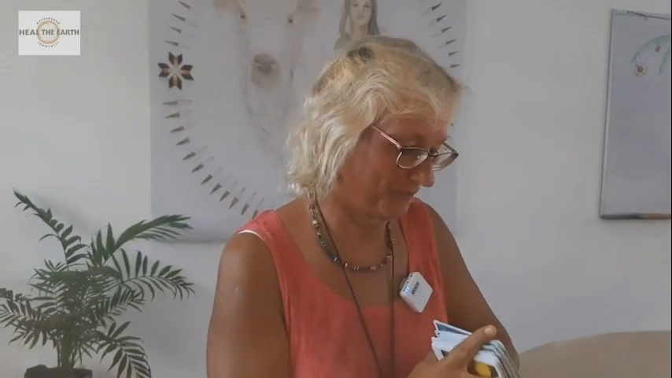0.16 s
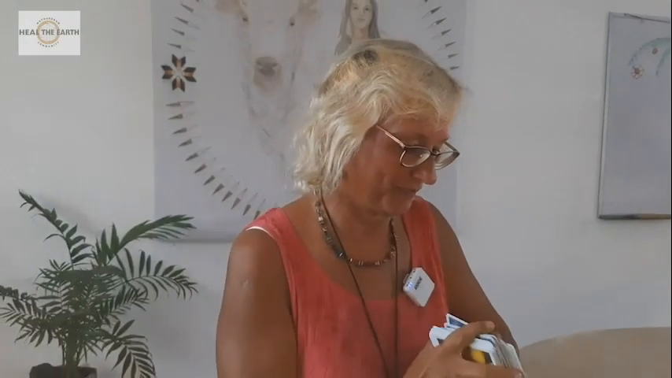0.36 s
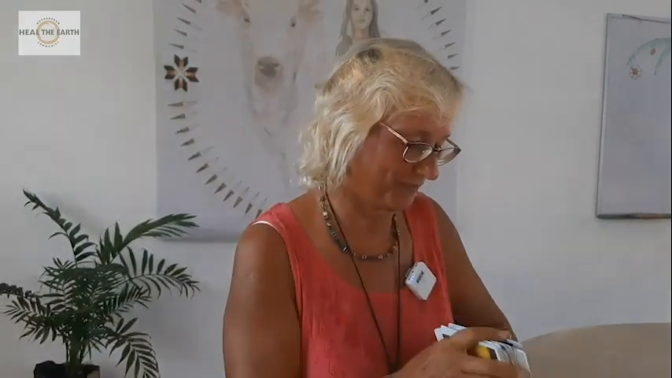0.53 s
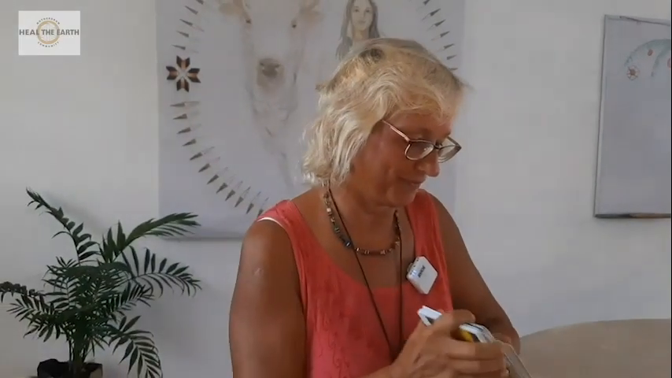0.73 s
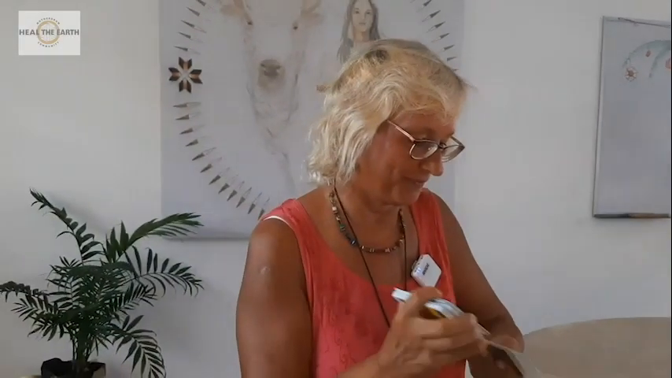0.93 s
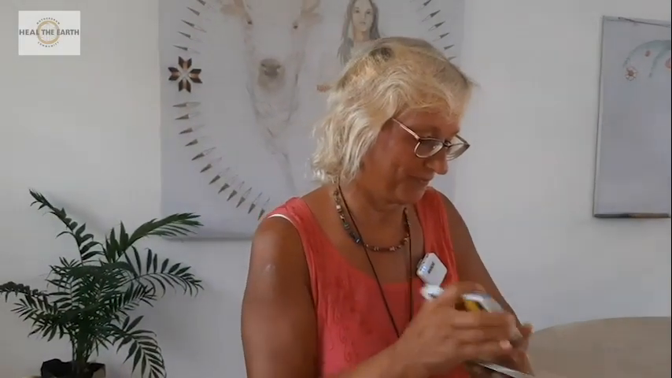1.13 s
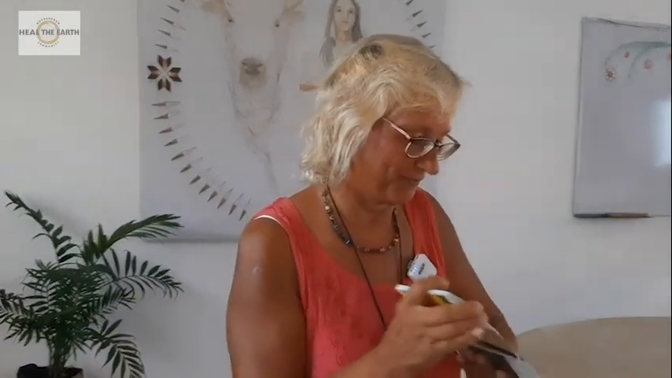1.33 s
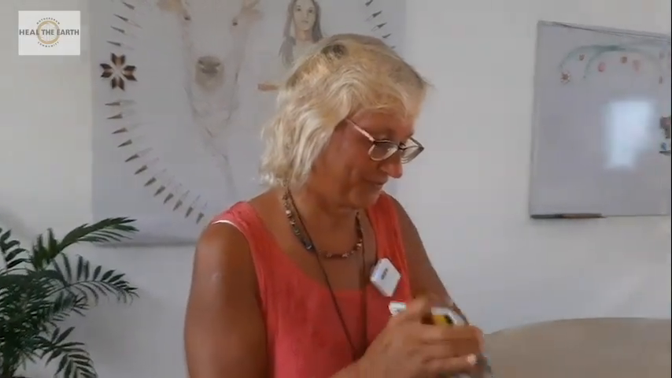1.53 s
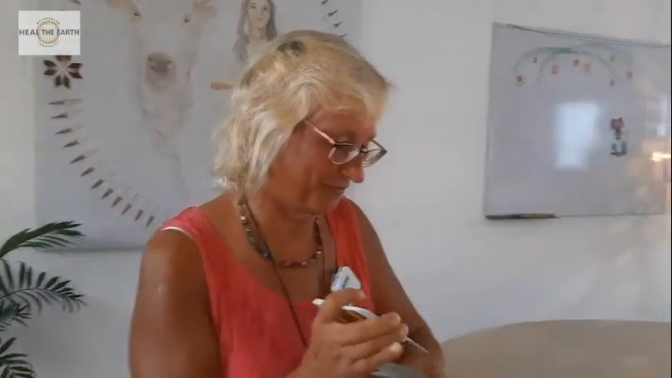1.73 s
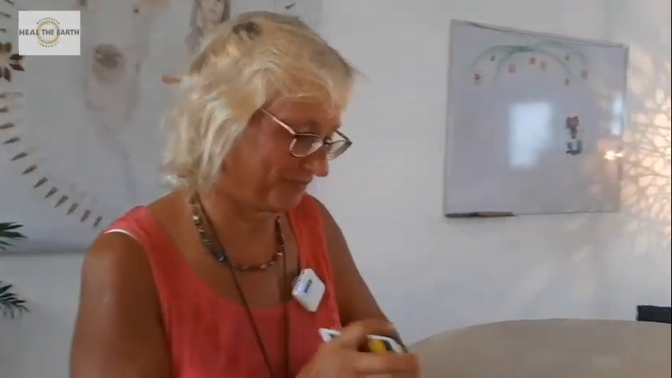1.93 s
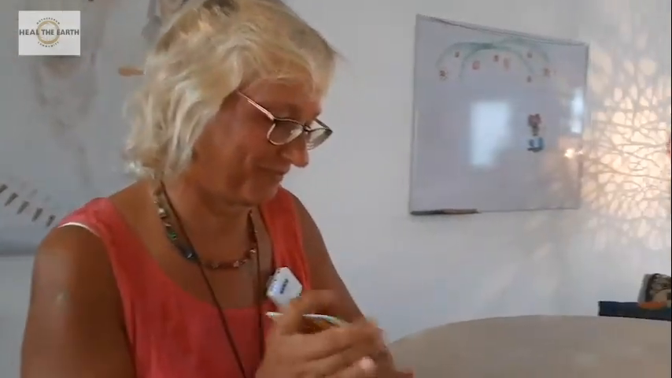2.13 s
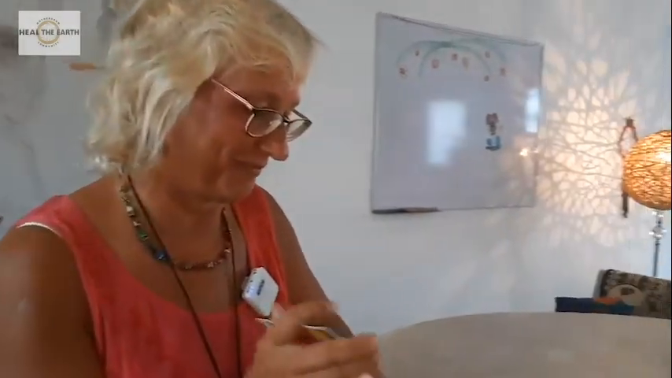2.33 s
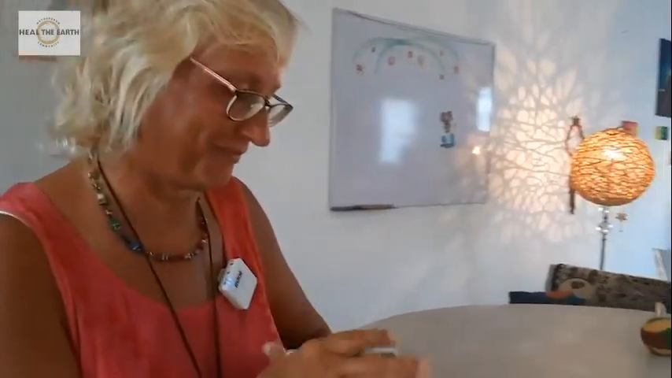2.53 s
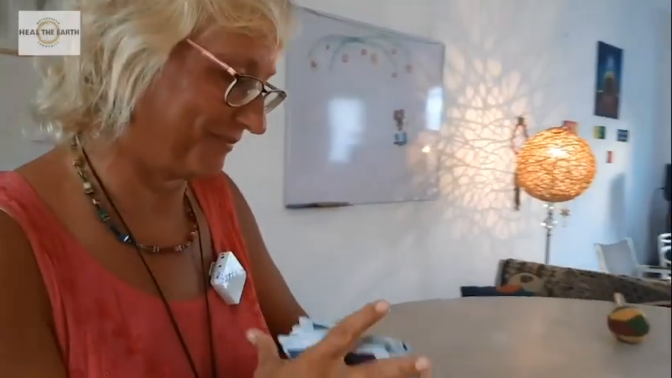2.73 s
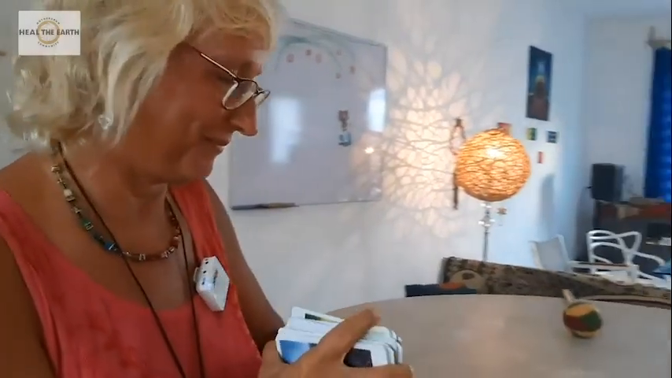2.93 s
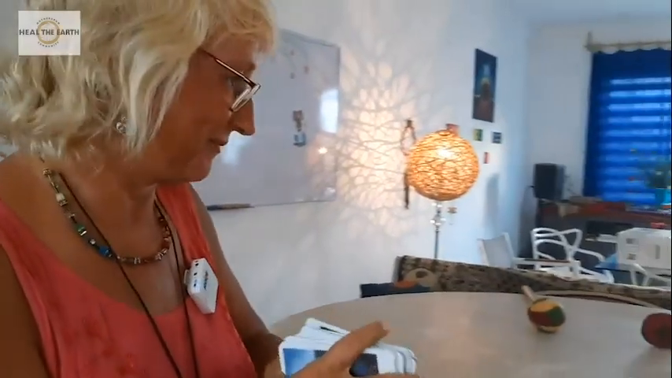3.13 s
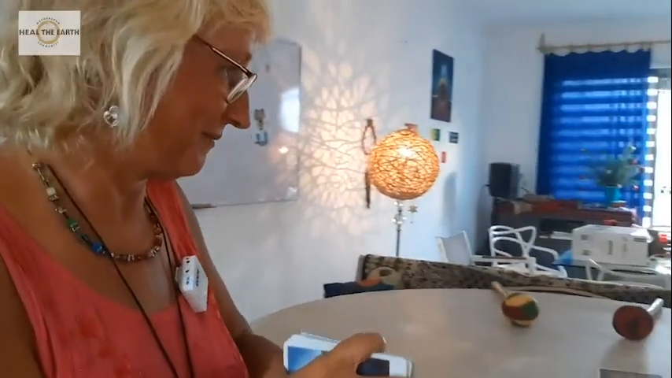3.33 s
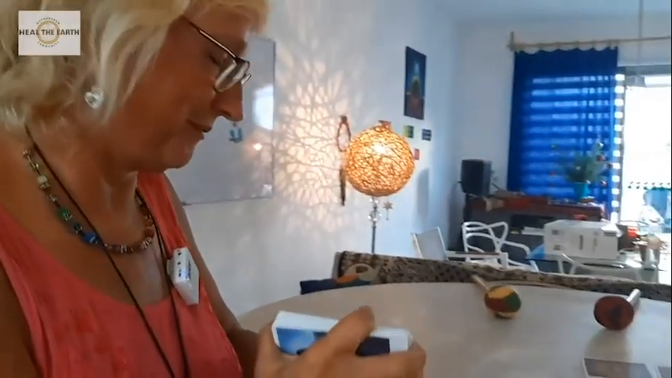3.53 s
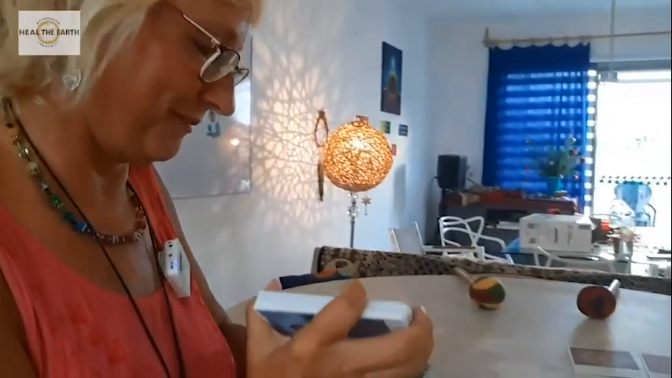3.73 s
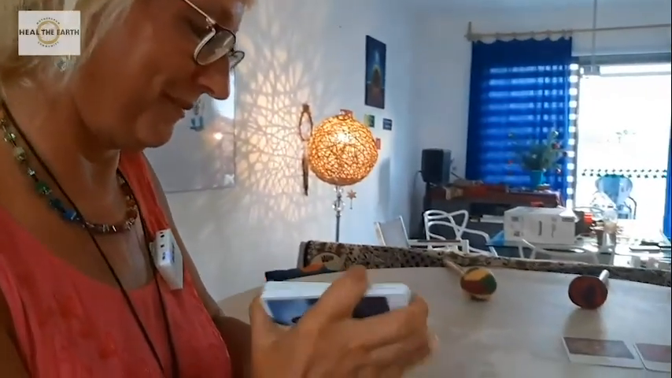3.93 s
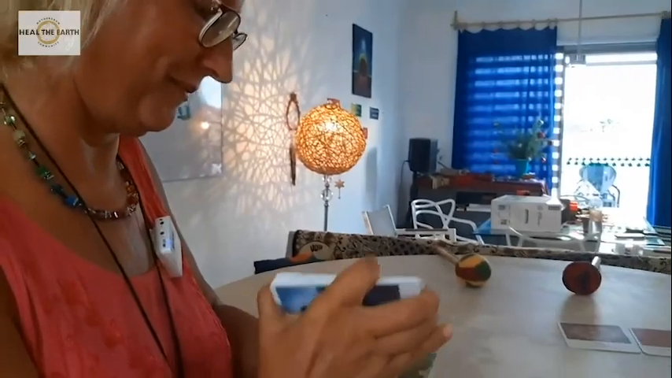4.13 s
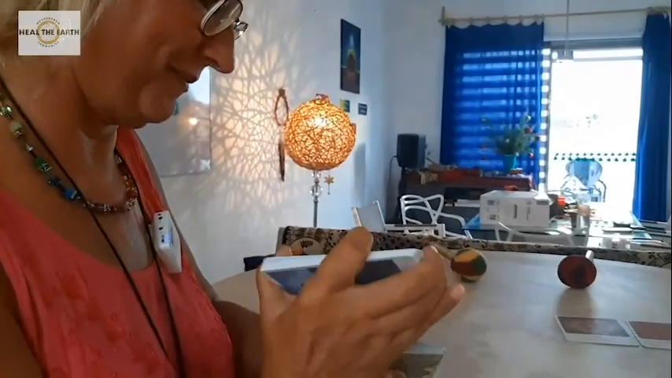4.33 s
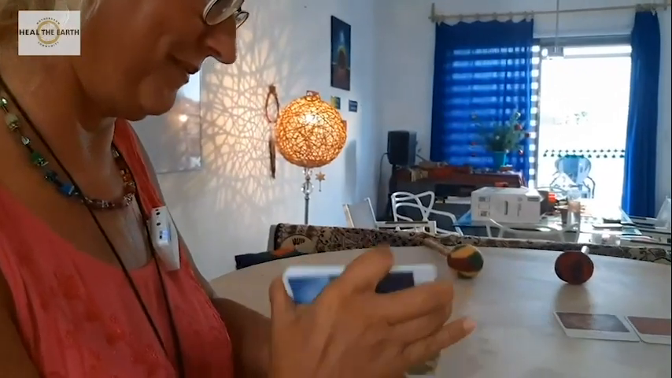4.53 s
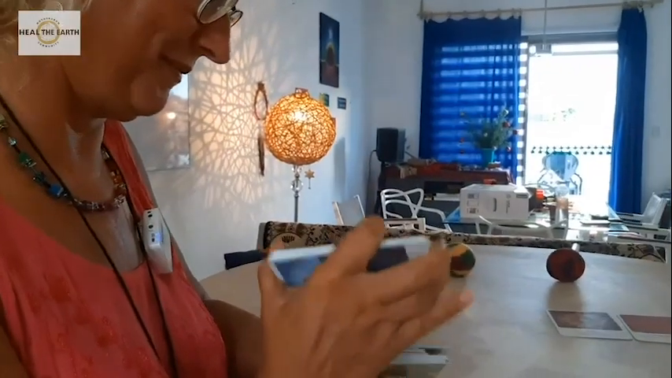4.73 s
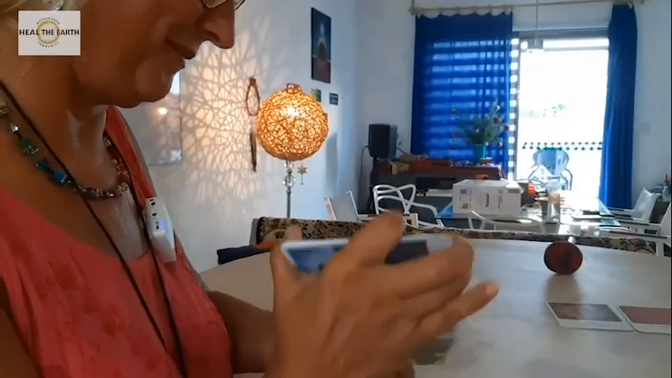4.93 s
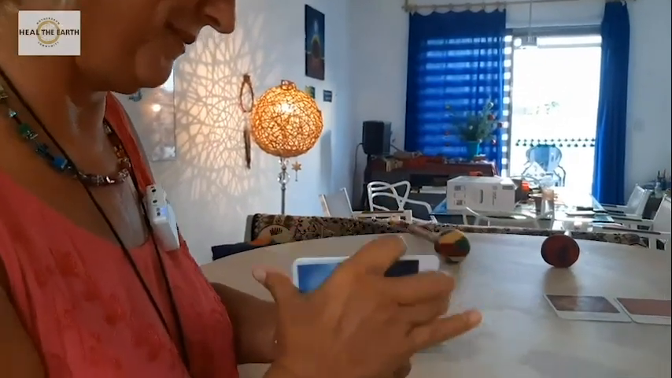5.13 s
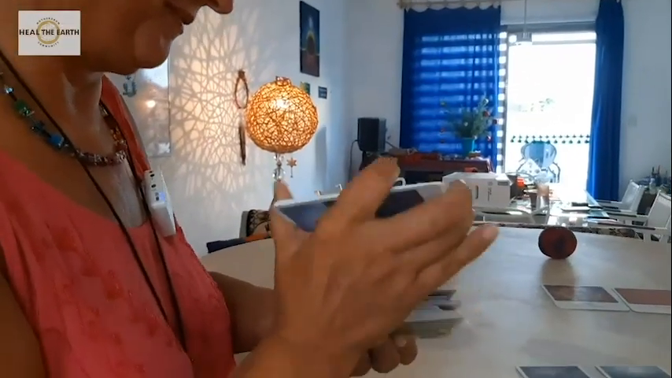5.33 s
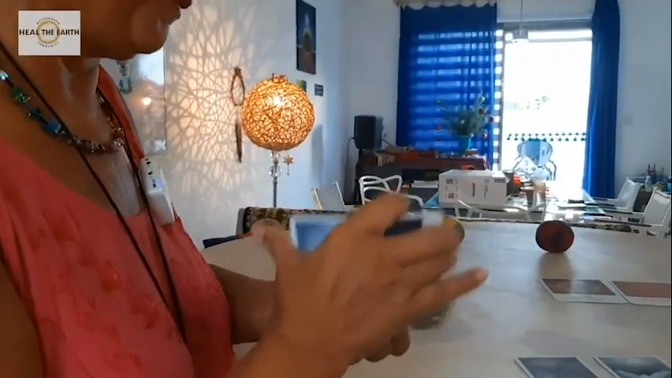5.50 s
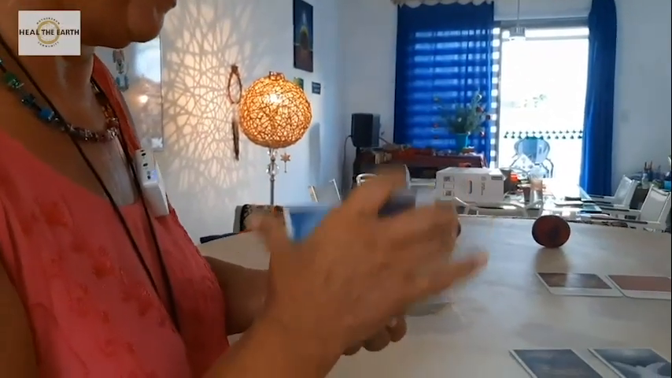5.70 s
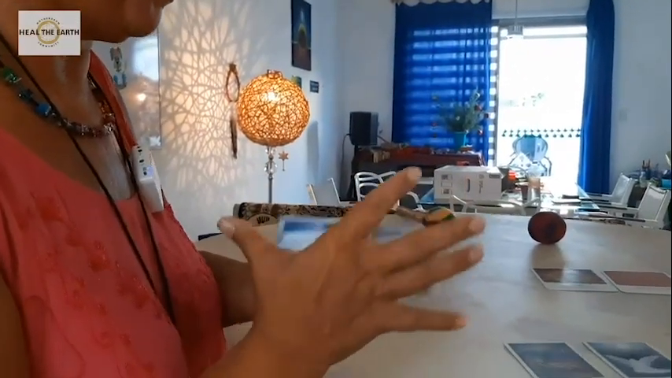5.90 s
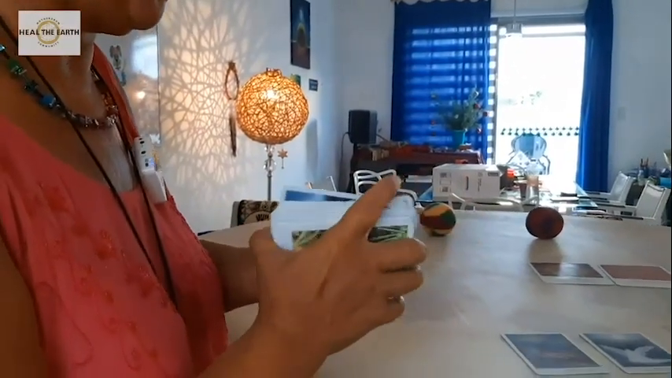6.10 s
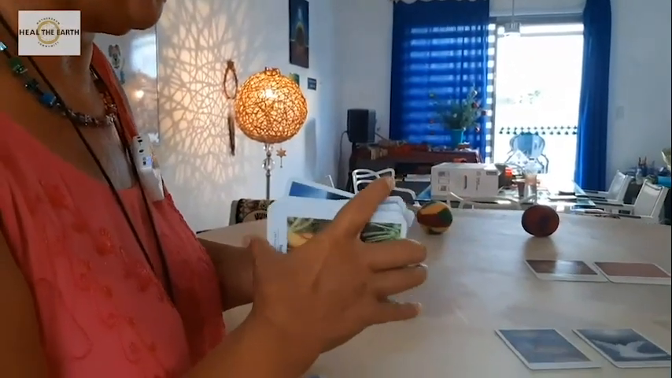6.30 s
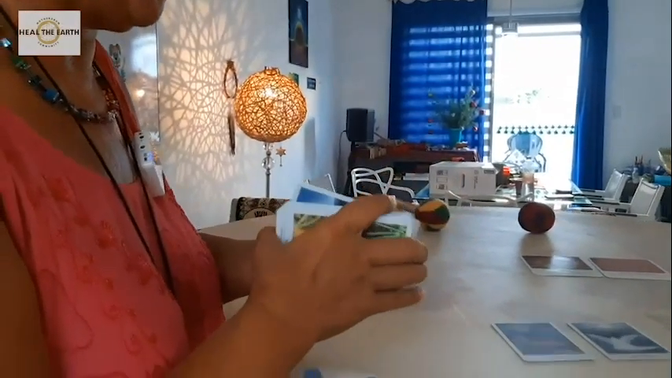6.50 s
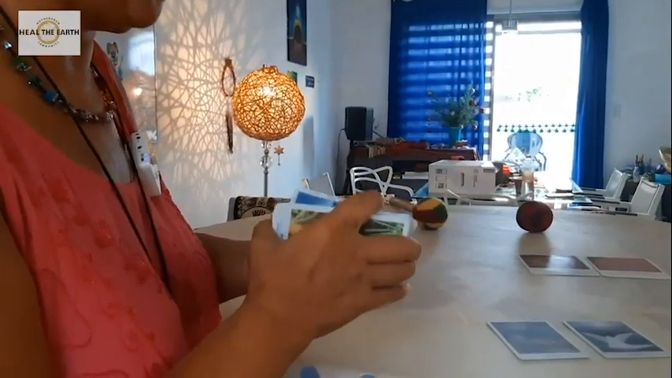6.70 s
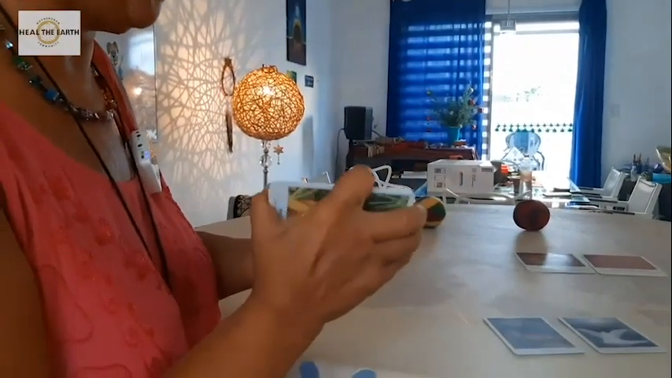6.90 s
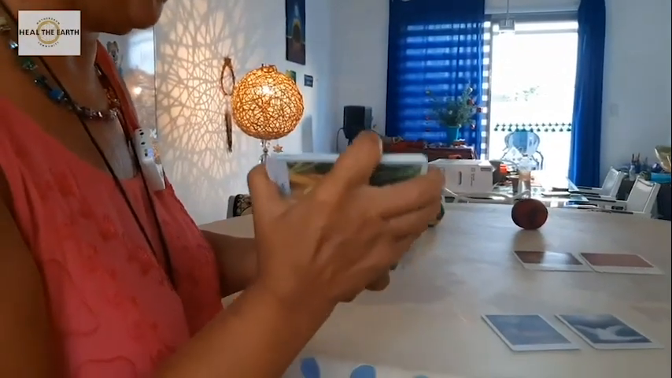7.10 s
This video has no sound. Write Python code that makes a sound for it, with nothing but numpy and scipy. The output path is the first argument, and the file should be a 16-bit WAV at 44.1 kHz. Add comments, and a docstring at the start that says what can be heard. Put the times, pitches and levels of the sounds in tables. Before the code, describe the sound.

A close, dry-sounding indoor scene with slight room reverberation. A muffled room wash and low wavering appliance hum swell and fade throughout. From 0 to 1.1 s there are only faint papery glides and tiny edge ticks. At about 1.2 s a sharp, loud crack opens the first shuffling run: irregular slaps near 1.6, 1.9 and 2.25 s, then a bright dense cluster around 2.55 s, each with a noisy rub and a short low palm thump. From 2.7 to 3.7 s it lulls to light rustling. The second run starts at 3.8 s, with strokes near 4.05, 4.25, 4.5, 4.85, 5.15 and 5.5 s, crisp and clattering, ending about 5.8 s. Soft low air puffs bump the microphone, thickest just before 6 s. Then quiet faint sliding, a few small flicks after 7 s, and the hum rising to the end.

```python
"""Living room, microphone close to a deck of large cards shuffled overhand; an appliance hums over the room tone.
A few soft glides come first, then a run of strokes from about 1.2 s and, after a lull, another from 3.8 s.
In each stroke a packet slides with a noisy rub, card edges crack and ring, and some land in the palm: a low push.
Stirred air puffs on the capsule as low lumps, thickest just before 6 s; a few last edges flick after 7 s.
The room tone, dull noise with wavering tones, swells and fades throughout and ends on a swell."""
import sys
import numpy as np
from scipy import signal
from scipy.io import wavfile
from scipy.ndimage import uniform_filter1d

SR = 44100
rng = np.random.default_rng(int(sys.argv[2]) if len(sys.argv) > 2 else 0)


def to_wav(s):
    """Save 16-bit WAV."""
    ch = np.atleast_2d(s).T  # columns
    pcm = np.round(np.clip(ch, -1, 1) * 32767)  # PCM
    wavfile.write(sys.argv[1], SR, pcm.astype(np.int16))


N = 319769


def gain_of(db):
    """Amplitude factor of a level in dB."""
    return 10 ** (np.asarray(db) / 20)


def evened(x):
    """Scales a signal to rms 1."""
    return x / np.sqrt(np.mean(x ** 2) + 1e-20)


def read(points, hz):
    """Reads a curve of (f/Hz, value) along log frequency."""
    f, value = np.transpose(points)
    return np.interp(np.log(hz + 1), np.log(f + 1), value)


def follow(rows):
    """Every column after the time t/s, interpolated at every sample."""
    s, *columns = np.transpose(rows)
    return [np.interp(np.arange(N) / SR, s, c, c[0], c[-1]) for c in columns]


def add(mix, s, sound):
    """Lays a short sound into the mix from s seconds on."""
    part = mix[round(s * SR):][:len(sound)]
    part += sound[:len(part)]


def wander(rate):
    """Slow chance of rms 1, with rate new values a second joined by lines."""
    steps = rng.standard_normal(int(N / SR * rate) + 2)
    return evened(np.interp(np.arange(N) / SR * rate, np.arange(len(steps)), steps))


def filtered(x, order, hz, kind="low"):
    """Butterworth filter at hz."""
    return signal.sosfilt(signal.butter(order, hz, kind, fs=SR, output="sos"), x)


# the room's background swelling and fading: t/s, level/dB (before the gains of wash and hum)
ROOM_TONE_LEVEL = [(0.0, -49.5), (0.7, -53), (1.23, -46.5), (1.69, -55), (2.44, -53), (3.51, -58.5),
                   (3.78, -51.5), (3.94, -44.5), (4.16, -43), (4.9, -47), (5.33, -48), (5.94, -55),
                   (6.5, -56.5), (6.95, -45), (7.25, -43)]
# colour of the dull wash: f/Hz, relative density/dB per Hz
WASH_COLOUR = [(18, -60), (60, -62), (100, 1), (160, -13.5), (220, 0), (310, -13), (390, 1.5), (450, -14.5),
               (600, -12), (695, -5.5), (760, -18.5), (1460, -21.5), (2480, -23), (6000, -32),
               (16000, -39.5)]
# appliance tones, before their wavering: f/Hz, level/dB at a room tone of -48 dB
HUM_TONES = [(118.4, -52), (236.9, -55.5), (285.3, -58.5), (355.3, -60.5), (409.1, -53), (468.3, -63),
             (527.6, -62.5), (592.2, -63), (699.8, -56), (829.0, -67.5), (872.1, -69), (1001, -65),
             (1384, -77), (1588, -69.5)]


def room_tone(wash_db=4, hum_db=48, waver_db=2, blur_hz=2.41):
    """A smooth dull noise wash, and motor tones whose level and pitch waver a little."""
    frames, hz = N // 256 + 5, np.fft.rfftfreq(1024, 1 / SR)
    real, imaginary = rng.standard_normal((frames, 513, 2)).T
    spectra = (real + 1j * imaginary) * gain_of(read(WASH_COLOUR, hz)[:, None])
    wash = evened(signal.istft(spectra, nperseg=1024, noverlap=768)[1][:N])

    hum = np.zeros(N)
    for f, db in HUM_TONES:
        level = gain_of(db + waver_db * wander(rate=11))
        phase = 2 * np.pi * np.cumsum(f + blur_hz * wander(rate=15)) / SR
        hum += level * np.sin(phase)
    # sqrt(2) makes the tone levels rms levels
    both = gain_of(wash_db) * wash + np.sqrt(2) * gain_of(hum_db) * hum
    return gain_of(follow(ROOM_TONE_LEVEL)[0]) * both


# low lumps of air at the capsule: centre t/s, envelope peak level/dB, f/Hz,
# width between the points 9.8 dB below the peak/ms (3 ms at least)
AIR_PUFFS = [(0.291, -35, 140.2, 12), (1.219, -32.5, 151.2, 14.4), (1.919, -30, 221.8, 9.9),
             (2.308, -26, 172.3, 7.1), (2.544, -22, 206.7, 12), (3.765, -28.5, 152, 13),
             (3.85, -35, 110, 12), (3.96, -37, 110, 12), (4.044, -33, 200, 6.3), (4.233, -17, 194, 5.7),
             (4.35, -35, 110, 12), (4.513, -25.5, 160, 6.3), (4.857, -24, 220, 11),
             (5.123, -27, 211.5, 9.3), (5.169, -29, 188, 8), (5.246, -26, 134, 8.8), (5.469, -29, 220, 15),
             (5.512, -9.5, 178, 6.1), (5.735, -28.5, 158, 12), (5.765, -27.5, 143, 13),
             (5.82, -26.5, 116, 25), (5.855, -26.5, 141, 6.2), (5.876, -32, 117, 26),
             (5.901, -20, 141, 6.1), (5.92, -13.5, 169, 5.6), (5.959, -26, 156, 9.3), (5.993, -28, 145, 14),
             (6.009, -27, 123, 4.9), (6.025, -34, 106, 27), (6.064, -37, 167, 5.7), (6.158, -33, 110, 7.8),
             (6.624, -36, 142, 4.9), (6.709, -37, 129, 4.9), (7.17, -34.5, 198, 11.4)]


def puffs(sharp=1.13, wake_db=-3, wake_hz=130):
    """Each eddy rocks the capsule at a low pitch and trails a loose rumble."""
    t, out = np.arange(-1800, 1800) / SR, np.zeros(N)
    for (s, db, hz, ms), turn in zip(AIR_PUFFS, rng.random(len(AIR_PUFFS))):
        envelope = gain_of(db - 9.8 * abs(2000 * t / max(ms, 3)) ** sharp)
        add(out, s + t[0], envelope * np.cos(2 * np.pi * (hz * t + turn)))
    rumble = evened(filtered(rng.standard_normal(N), 2, wake_hz))
    nearby_strength = uniform_filter1d(abs(out), size=2500)
    return out + gain_of(wake_db) * nearby_strength * rumble


# how long the living room rings: f/Hz, time to fall 60 dB/s
ROOM_DECAY = [(200, 0.38), (600, 0.55), (1400, 0.62), (3700, 0.38), (10000, 0.18)]


def walls(x):
    """Sparse echoes of random sign, one in every 20 samples, each band dying at its own speed."""
    taps = np.zeros(SR // 2)
    at = np.arange(160, len(taps) - 20, 20)
    taps[at + rng.integers(0, 20, len(at))] = rng.choice([-1., 1.], len(at))
    hz, t, spectra = signal.stft(taps, SR, nperseg=256)
    decay = gain_of(-60 * t / read(ROOM_DECAY, hz)[:, None])
    tail = signal.istft(spectra * decay, SR, nperseg=256)[1]
    return signal.fftconvolve(x, tail / np.linalg.norm(tail))[:N]


def resonate(x, hz, width):
    """Shifts the curve hz down to zero, smooths, and shifts back: a resonance of gain 1."""
    turn = np.exp(2j * np.pi * np.cumsum(hz * np.ones(len(x))) / SR)
    r = np.exp(-np.pi * width / SR)
    return 2 * (turn * signal.lfilter([1 - r], [1, -r], x / turn + 1e-18)).real


# what the stacked cards ring with: f/Hz, width/Hz, level/dB
DECK_MODES = [(828, 400, -2.5), (1355, 385, 1.5), (2340, 1030, 1), (3316, 670, 3), (4144, 885, 2.5),
              (6620, 2190, -2.5), (11100, 11000, -17.5)]


def deck(x):
    """The broad modes of the stacked cards, neighbours in opposite phase."""
    return sum((-1) ** k * gain_of(db) * resonate(x, hz, width)
               for k, (hz, width, db) in enumerate(DECK_MODES))


def patchy(x, depth_db):
    """Lifts and lowers random small patches of time and pitch."""
    spectra = signal.stft(x, nperseg=256)[2]
    field = uniform_filter1d(rng.standard_normal(spectra.shape), size=4, axis=0)
    field = uniform_filter1d(field, size=6, axis=1)
    return evened(signal.istft(spectra * gain_of(depth_db * evened(field)), nperseg=256)[1][:N])


# faces scuffing after a packet drops: t/s, level/dB, fade/dB per s,
# smoothness as treble lift/dB, air pocket between the packets f/Hz, its strength/dB
PACKET_SCUFFS = [(0.0, -40.5, 69, -2, 4650, -2.5), (1.204, -14, 600, -10, 1380, 2.5),
                 (1.222, -24.5, 152, -9, 3600, -14), (1.693, -30, 900, 2, 1110, -2),
                 (2.221, -23, 900, 0, 1390, 1), (2.342, -35, 900, -1, 2220, -6),
                 (2.517, -28.5, 294, -2, 2230, -14), (3.76, -35, 600, 5.5, 930, 5),
                 (4.23, -36, 210, -25, 2685, -4), (4.453, -22, 157, 4, 6250, -9),
                 (4.584, -39.5, 230, 0, 853, -5), (4.803, -23, 198.5, 2, 3120, -2),
                 (4.93, -32, 400, -23, 4300, -11), (5.113, -24, 150, -2, 4260, -7),
                 (5.434, -20.5, 185, -7.5, 1310, 2), (5.509, -27.5, 430.5, -9, 4750, -7),
                 (5.726, -35, 133, -13, 4570, -5)]
SCUFF_RISE_S = 0.00051
TAIL_DB, TAIL_DB_PER_S, TAIL_LIFT_DB = -20, 120, -19
RUSTLE_POCKET_HZ, RUSTLE_POCKET_DB = 3660, -17  # the tails share this pocket strength


def scuff_strokes():
    """Each scuff starts suddenly and dies away, over a weaker dull tail."""
    strokes = []
    for s, db, fade, lift, hz, strength in PACKET_SCUFFS:
        u = np.maximum(np.arange(N) / SR - s, 0)
        rise = np.minimum(u / SCUFF_RISE_S, 1) * gain_of(db)
        strokes.append((rise * gain_of(-fade * u), lift, hz, strength))
        tail = rise * gain_of(TAIL_DB - TAIL_DB_PER_S * u)
        strokes.append((tail, TAIL_LIFT_DB, hz, RUSTLE_POCKET_DB))
    return strokes


# packets gliding along the deck: start t/s, length/s, peak level/dB,
# smoothness as treble lift/dB, air pocket f/Hz
PACKET_GLIDES = [(0.227, 0.089, -46, 7, 4400), (0.395, .085, -49.5, 5, 2400), (0.623, 0.3, -53.5, 4, 3500),
                 (1.26, .097, -40.5, 14, 5400), (1.56, 0.064, -35, 6.5, 4370),
                 (1.615, 0.074, -34.5, 7, 2550), (1.888, 0.061, -34, 8, 2400),
                 (1.925, 0.084, -33.5, 17, 2600), (2.228, 0.11, -39, 6, 2660),
                 (2.497, 0.022, -41.5, 16, 1640), (2.534, .045, -25, -5, 2350), (2.57, .05, -31, -20, 4650),
                 (2.826, .06, -54.5, 2, 4500), (2.894, 0.076, -44, 5, 4887), (3.08, 0.066, -53, -10, 3608),
                 (3.21, .04, -60, 10, 4500), (3.674, .055, -44.5, 37, 5600),
                 (3.952, 0.091, -40.5, 12, 3360), (4.026, 0.067, -26.5, -8, 4230),
                 (4.079, 0.1, -37, -2, 2920), (4.143, 0.078, -35.5, -4, 2820),
                 (4.523, 0.051, -24.5, 14, 2600), (4.863, 0.058, -34, 7, 2524),
                 (5.135, .04, -31, -17, 2480), (5.172, .065, -29, 25, 5200), (5.227, .04, -36.5, 2, 4340),
                 (5.4, 0.049, -39.5, 14, 3620), (6.065, 0.072, -42, 10, 2310), (6.221, 0.044, -52, 0, 860),
                 (6.317, 0.045, -53.5, 18, 3450), (6.68, 0.18, -54.5, 3, 3540), (7.043, .09, -42, 1, 4270)]


def glide_strokes(sharp=1.2, pocket_db=-8):
    """Each gliding packet swells and fades in one arch."""
    strokes = []
    for s, length, db, lift, hz in PACKET_GLIDES:
        progress = np.clip((np.arange(N) / SR - s) / length, 0, 1)
        arch = abs(np.sin(np.pi * progress)) ** sharp
        strokes.append((gain_of(db) * arch, lift, hz, pocket_db))
    return strokes


# faint rustle of the held deck between strokes: t/s, level/dB, smoothness as treble lift/dB
HELD_RUSTLE = [(0.2, -58, 2), (0.55, -59.5, 4), (1.0, -62.5, -20), (1.2, -46, -6), (1.5, -57.5, -10),
               (1.86, -57, -4), (2.2, -56.5, -10), (2.49, -55, -8), (2.63, -51, -14), (2.89, -53, -5),
               (3.0, -58, -16), (3.3, -63.5, 0), (3.62, -61.5, 4), (3.8, -54, -1), (3.93, -55.5, 12),
               (4.4, -54, -8), (4.75, -50.5, -8), (5.05, -47, -30), (5.3, -53.5, -3), (5.65, -66.5, -13),
               (6.0, -55.5, -5), (6.2, -63, -2), (6.68, -67, 10), (6.94, -51.5, -4), (7.05, -44.5, -5.5),
               (7.25, -44.5, -25)]


def rubbing():
    """Scuffs, glides and rustle add up in power; the strongest of the moment sets the air pocket."""
    rustle_db, rustle_lift_db = follow(HELD_RUSTLE)
    best = gain_of(rustle_db) ** 2
    total, lift_db, pocket_db = best, best * rustle_lift_db, best * RUSTLE_POCKET_DB
    pocket_hz = np.full(N, float(RUSTLE_POCKET_HZ))
    for level, lift, hz, strength in scuff_strokes() + glide_strokes():
        power = level ** 2
        pocket_hz = np.where(power > best, hz, pocket_hz)
        best = np.maximum(power, best)
        total = total + power
        lift_db = lift_db + power * lift
        pocket_db = pocket_db + power * strength
    # treble lift and pocket strength are averages weighted by power
    return 10 * np.log10(total), lift_db / total, pocket_hz, pocket_db / total


def slide(level_db, lift_db, pocket_hz, pocket_db, catches_per_s=5000, spread_db=3., hiss_db=0.,
          split_hz=3500, flutter_db=1.0, pocket_width_hz=400):
    """Tiny catches between the faces plus a smooth hiss, through the deck and the air pocket of the moment."""
    strengths = gain_of(spread_db * np.minimum(rng.exponential(1, N), 5))
    catches = strengths * (rng.random(N) < catches_per_s / SR) * rng.choice([-1, 1], N)
    drive = evened(catches) + gain_of(hiss_db) * rng.standard_normal(N)
    # the grip shifts, and the ringing area with it
    rub = patchy(deck(drive), depth_db=2.)

    low = evened(filtered(rub, 2, split_hz))
    high = evened(filtered(rub, 2, split_hz, "high"))
    tilted = (low - gain_of(lift_db) * high) / np.hypot(1, gain_of(lift_db))

    pocket = resonate(drive, pocket_hz, pocket_width_hz)
    pocket = evened(resonate(pocket, pocket_hz, pocket_width_hz))
    both = (tilted + gain_of(pocket_db) * pocket) / np.hypot(1, gain_of(pocket_db))
    return gain_of(level_db + flutter_db * wander(rate=150) + 0.34 * wander(rate=10)) * both


# packets landing in the palm: t/s, peak level/dB
PALM_THUDS = [(1.204, -24), (1.2174, -18), (1.2546, -22), (1.3688, -29.5), (1.5934, -26), (1.6478, -23.5),
              (1.6949, -33), (1.9118, -22), (1.9301, -23), (2.2246, -27), (2.2616, -19.5), (2.3011, -23),
              (2.3436, -24), (2.5175, -22.5), (2.5399, -16), (2.5466, -18), (2.5585, -24), (2.579, -27),
              (2.601, -22.5), (3.7608, -18.5), (3.852, -34), (4.03, -29), (4.0505, -16), (4.0665, -16.5),
              (4.2319, -12), (4.4862, -18), (4.4912, -22), (4.504, -18.5), (4.567, -22), (4.5836, -19.5),
              (4.8044, -21), (4.8235, -21), (4.84, -19.5), (4.857, -28), (4.893, -28), (4.9322, -20),
              (5.1135, -26), (5.1236, -26), (5.141, -18.5), (5.1573, -19), (5.1639, -17), (5.235, -19.5),
              (5.4589, -18), (5.468, -16.5), (5.509, -12.5), (5.5325, -16.5), (5.729, -21.5),
              (5.7482, -21.5), (5.7768, -28), (7.1679, -19.5)]


def thuds(thud_hz=480, thud_ms=2.83):
    """The palm gives a short low push, falling 20 dB every thud_ms."""
    t, out = np.arange(2000) / SR, np.zeros(N)
    push = np.sin(2 * np.pi * thud_hz * t) * gain_of(-20 * 1000 * t / thud_ms)
    for s, db in PALM_THUDS:
        add(out, s, gain_of(db) * push / abs(push).max())
    return out


STRAY_TRIES_PER_S, STRAY_MS = 70, 1.75
STRAY_SPREAD_DB = 12.5  # the most a stray's peak stands above the rubbing level
STRAY_LOW_HZ, STRAY_HIGH_HZ = 1370, 5800


def strays(level_db, loud_db=-60):
    """Small edges catch at random while the faces rub louder than loud_db, following the rubbing level."""
    rows = []
    for when, extra, pitch in rng.random((int(N / SR * STRAY_TRIES_PER_S), 3)):
        at = when * (N - 1)
        rub_db = level_db[int(at)]
        if rub_db > loud_db:
            hz = STRAY_LOW_HZ * (STRAY_HIGH_HZ / STRAY_LOW_HZ) ** pitch
            rows.append((at / SR, rub_db + STRAY_SPREAD_DB * extra, hz, STRAY_MS))
    return rows


# card edges striking close to the microphone: t/s, peak level/dB, flap pitch one length after the strike f/Hz,
# length in which the flap falls 14 dB/ms (0.6 ms at least)
EDGE_FLICKS = [(0.6603, -31, 3700, 2.6), (0.8005, -33, 4310, 2.8), (1.1218, -29.5, 2200, 1.9),
               (1.1644, -32, 4340, 1.5), (1.203, -2, 2638, 3.1), (1.207, -2, 1404, 1.7),
               (1.2173, -4.5, 3870, 0.96), (1.236, -18, 3510, 1.6), (1.249, -21, 3290, 1.4),
               (1.2542, -13.5, 1790, 2.6), (1.296, -16, 1400, 2.4), (1.3688, -19.5, 3950, 2.4),
               (1.5769, -19, 3780, 3.5), (1.5934, -17.5, 1300, 6.7), (1.6225, -20, 4450, 1.7),
               (1.6483, -19, 3930, 2.2), (1.6948, -7.5, 826, 4.4), (1.699, -20, 820, 1.6),
               (1.714, -36, 1003, 14), (1.726, -35, 990, 18), (1.727, -38, 2570, 30),
               (1.735, -34.5, 3470, 23), (1.83, -37, 2500, 2), (1.8658, -25.5, 2990, 4.2),
               (1.8895, -22, 4020, 3.8), (1.9077, -12.5, 2200, 2.8), (1.9109, -18, 2344, 2.9),
               (1.9217, -16, 4130, 2.1), (1.9301, -13.5, 2270, 3.8), (1.975, -25, 900, 2.5),
               (1.998, -14.5, 4070, 1.4), (2.2202, -24, 2880, 4.7), (2.2244, -7.5, 4230, 2.6),
               (2.2421, -20, 1420, 4.5), (2.2613, -14, 1480, 7), (2.3014, -21, 2340, 6.1),
               (2.3436, -12, 740, 4.1), (2.5173, -16, 4230, 2), (2.5357, -19, 1650, 1.7),
               (2.5406, -1.5, 2100, 0.9), (2.5469, -4, 1900, 2.3), (2.5593, -9, 2200, 10.8),
               (2.5615, -7.5, 5040, 2.2), (2.5636, -10, 2100, 2.9), (2.5799, -11.5, 4230, 5.6),
               (2.601, -20, 4300, 2.5), (2.668, -40, 1590, 24), (3.7605, -14, 800, 2.1),
               (3.7615, -19, 4000, 2.2), (3.801, -32, 1000, 5), (3.852, -34, 1010, 4.5),
               (4.005, -25, 1450, 1.97), (4.0293, -16, 1550, 1), (4.0505, -17, 4500, 1.8),
               (4.0669, -10.5, 3550, 2.7), (4.0264, -17.5, 6350, 1.04), (4.1349, -17, 1960, 1.7),
               (4.172, -18.5, 2500, 3.5), (4.2314, -8, 3500, 2.9), (4.2322, -9.5, 2800, 3.5),
               (4.4535, -6.5, 4740, 3.4), (4.4558, -13, 3120, 1.1), (4.467, -3, 3080, 1.7),
               (4.47, -4.5, 6230, 3.6), (4.4732, -10.5, 4000, 0.83), (4.479, -15, 2630, 1.7),
               (4.4859, -8, 2194, 3.8), (4.4912, -5.5, 4670, 2.4), (4.494, -6.5, 4420, 1.3),
               (4.4996, -12, 3700, 1.7), (4.504, -10, 4200, 5), (4.5583, -20, 2450, 3),
               (4.5836, -6.5, 780, 1.9), (4.8044, -8, 1686, 6.8), (4.8112, -10.5, 4560, 3.2),
               (4.8159, -23, 2540, 5.3), (4.8225, -11, 6930, 3.3), (4.8266, -11, 2390, 7.9),
               (4.8393, -9.5, 4720, 3.4), (4.8562, -5.5, 4330, 3.9), (4.893, -15.5, 808, 1.8),
               (4.9327, -4.5, 3670, 0.42), (5.1138, -18, 2580, 5), (5.1242, -9, 2590, 2.6),
               (5.1416, 0.5, 2410, 2.6), (5.1494, -5, 2230, 4.4), (5.1576, -5, 2700, 1.7),
               (5.1611, -1, 2320, 4.5), (5.1639, -7, 2450, 1.2), (5.1703, -27, 4570, 2.1),
               (5.236, -12, 5880, 2.6), (5.2425, -13, 870, 2.8), (5.436, -2.5, 2400, 3.5),
               (5.4476, -19, 1250, 6.5), (5.4589, -10, 1280, 5.1), (5.467, -10, 4600, 2.7),
               (5.4724, -6.5, 4470, 3.9), (5.509, -2.5, 2710, 1.05), (5.5327, -13, 820, 3.2),
               (5.729, -10, 3200, 5), (5.7482, -12, 2540, 5.1), (5.8106, -24.5, 4930, 4.3),
               (6.3286, -33.5, 2044, 2.5), (7.074, -27, 2820, 3), (7.088, -19.5, 2700, 5.5),
               (7.1679, -21, 982, 6.1)]
CLEAN_RING, LONG_MS, LONG_RING = 0.47, 11, 0.86  # share of clean ring; long flaps ring almost purely
EDGE_RISE_MS = 0.34


def flicks(rows, sag=0.054, crack_share=0.69, dull=2.3):
    """Each edge cracks into the deck, the air under its flap rings with a sagging pitch."""
    t, out = np.arange(2000) / SR, np.zeros(N)
    noise = rng.standard_normal((len(rows), len(t)))
    modes = deck(signal.unit_impulse(len(t)))
    rise = np.minimum(1000 * t / EDGE_RISE_MS, 1)
    for (s, db, hz, ms), grit in zip(rows, noise):
        u = 1000 * t / max(ms, .6)  # time in flap lengths
        clean = CLEAN_RING if ms < LONG_MS else LONG_RING
        soften = signal.butter(1, min(dull * hz, SR / 2.2), fs=SR)  # larger flaps crack more dully
        burst = signal.lfilter(*soften, grit * gain_of(-20 * u / crack_share))
        crack = signal.fftconvolve(burst, modes)[:len(t)]
        pitch = hz * (1 + sag * min(1, 5 / ms) * (1 - np.minimum(u, 2)))  # long flaps sag less
        flap = np.sin(2 * np.pi * np.cumsum(pitch) / SR) * gain_of(-14 * u)
        ring = rise * ((1 - clean) * evened(crack) + clean * evened(flap))
        add(out, s, gain_of(db) * ring / abs(ring).max())
    return out


def scene():
    """Only edges and thuds wake the room, not the rubbing; small cards radiate no deep bass."""
    rub = rubbing()
    edges = flicks(EDGE_FLICKS) + flicks(strays(rub[0])) + thuds()
    cards = edges + slide(*rub) + gain_of(-18.5) * walls(edges)
    cards = filtered(cards, 2, 130, "high")
    return (room_tone() + puffs() + cards)[None]


def record(dry, top_hz=15900):
    """The loudest cracks are clipped near full scale, the deep bass is dropped, then the band limit."""
    thin = filtered(np.clip(dry, -.97, .97), 4, 70, "high")
    band_limit = signal.firwin(511, top_hz, window=("kaiser", 9), fs=SR)
    return signal.oaconvolve(thin, band_limit[None], "same")


dry = scene()
out = record(dry)
to_wav(out)
```